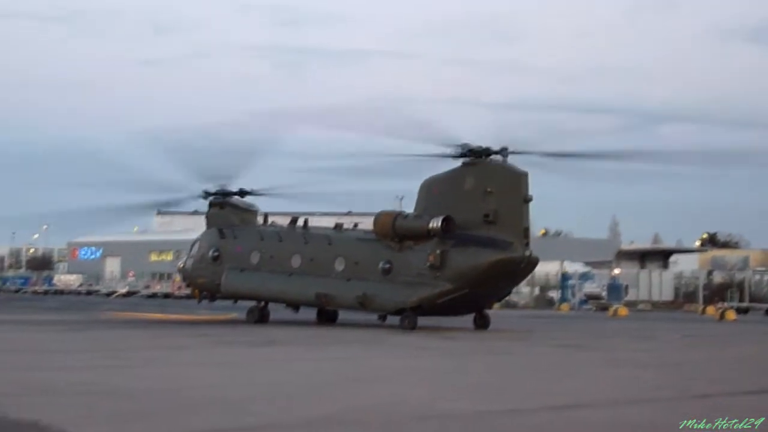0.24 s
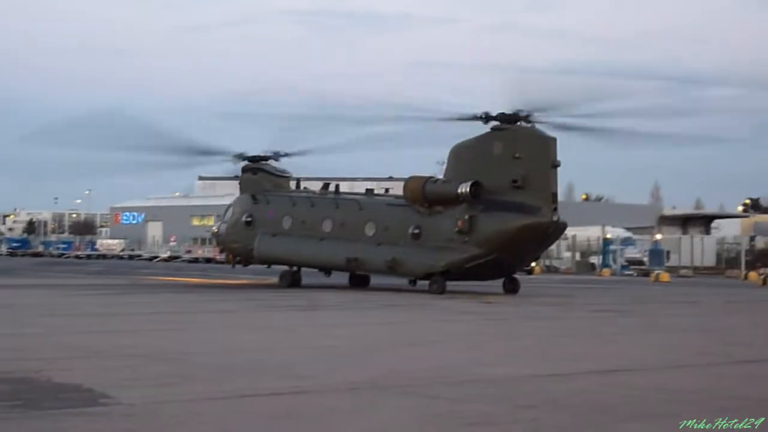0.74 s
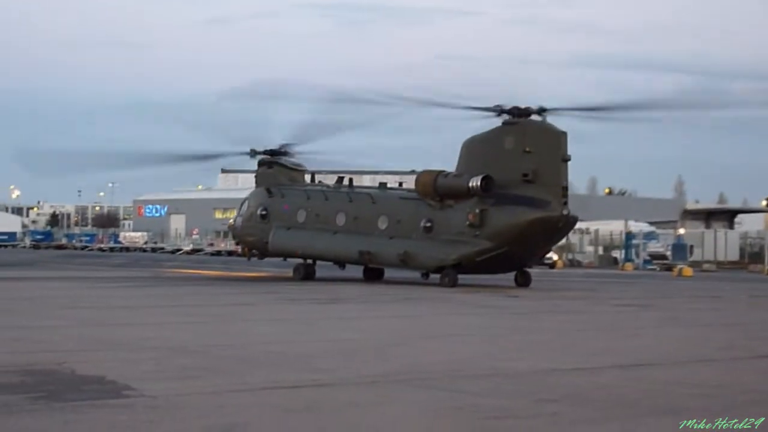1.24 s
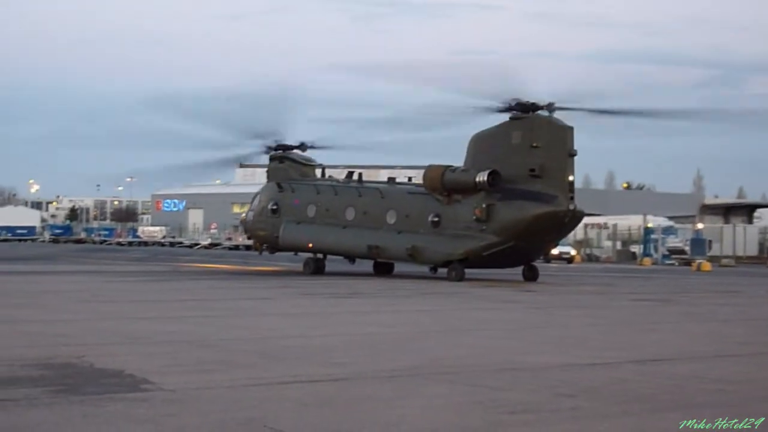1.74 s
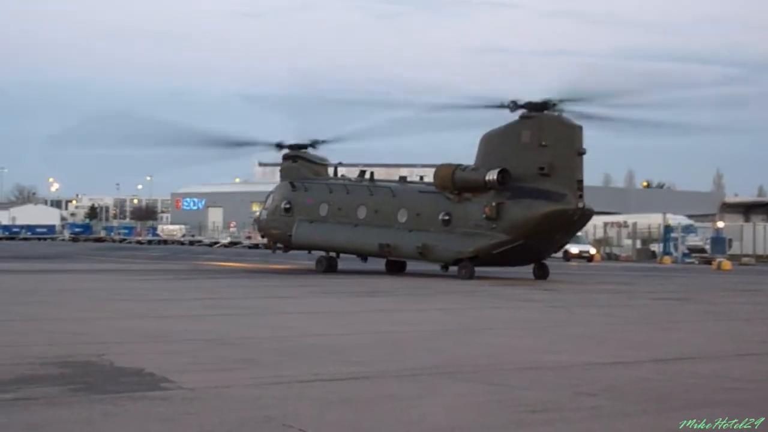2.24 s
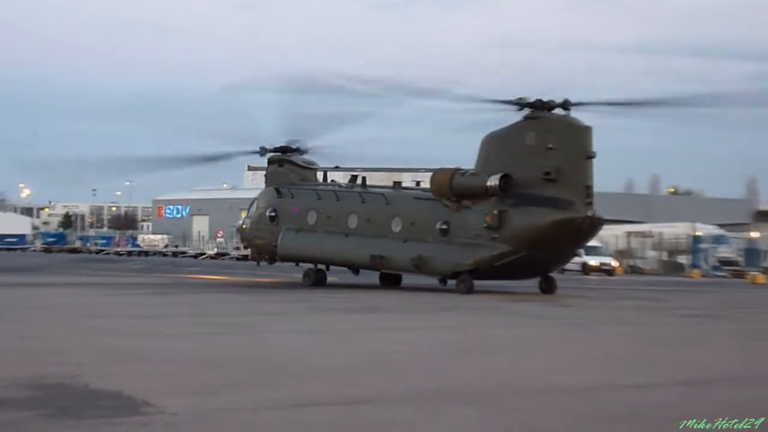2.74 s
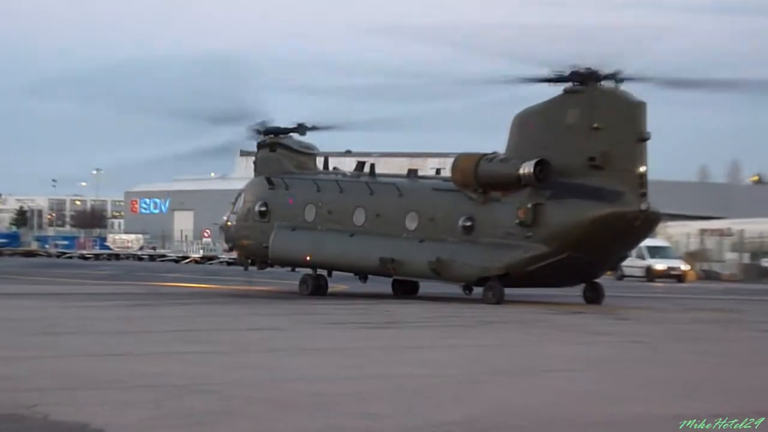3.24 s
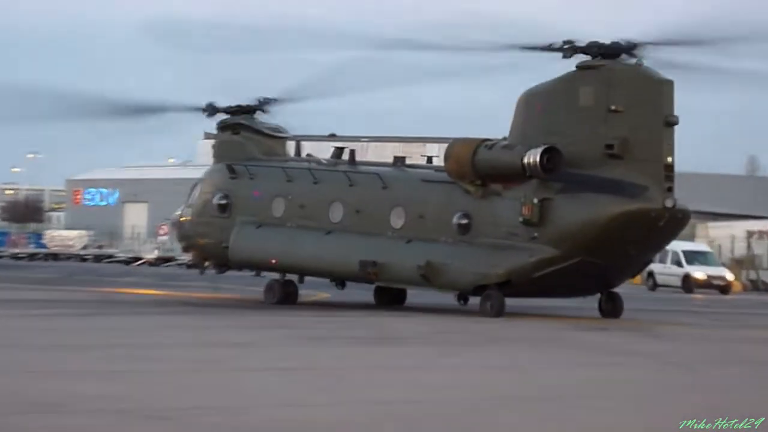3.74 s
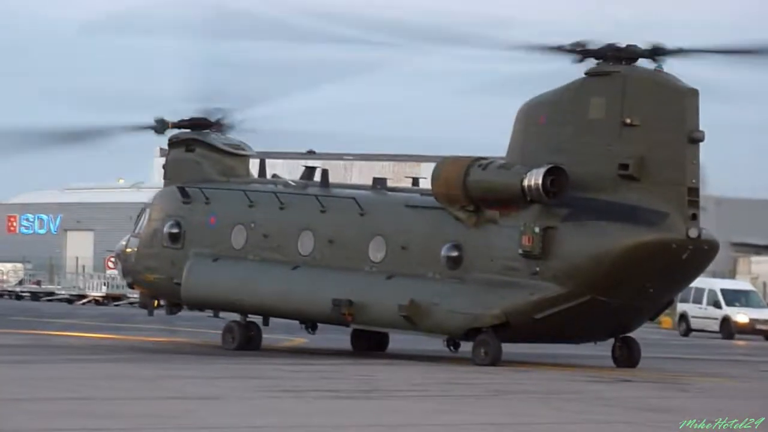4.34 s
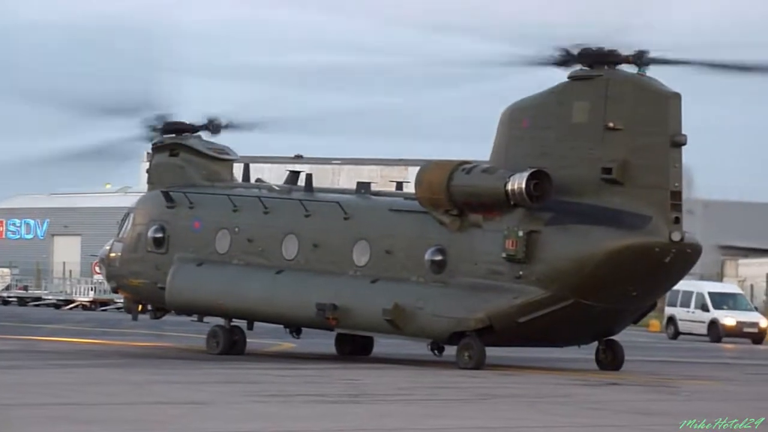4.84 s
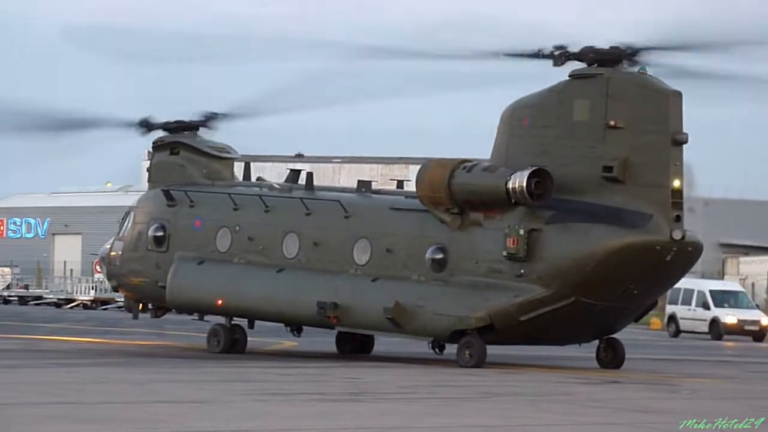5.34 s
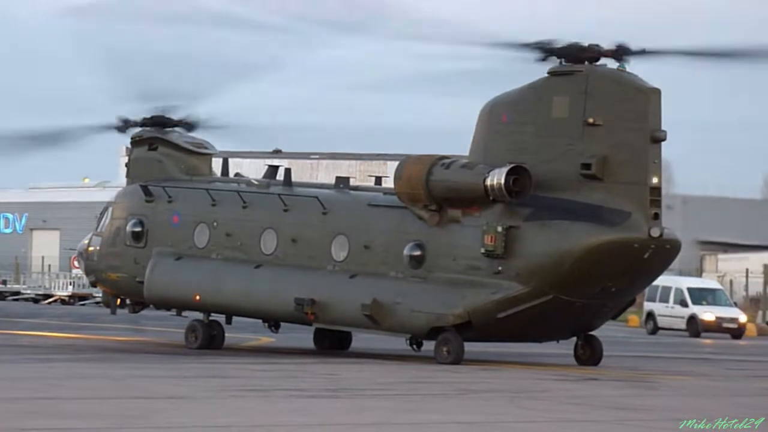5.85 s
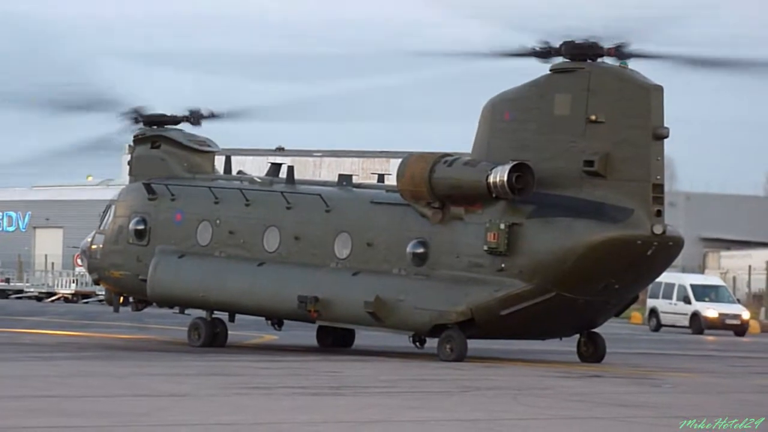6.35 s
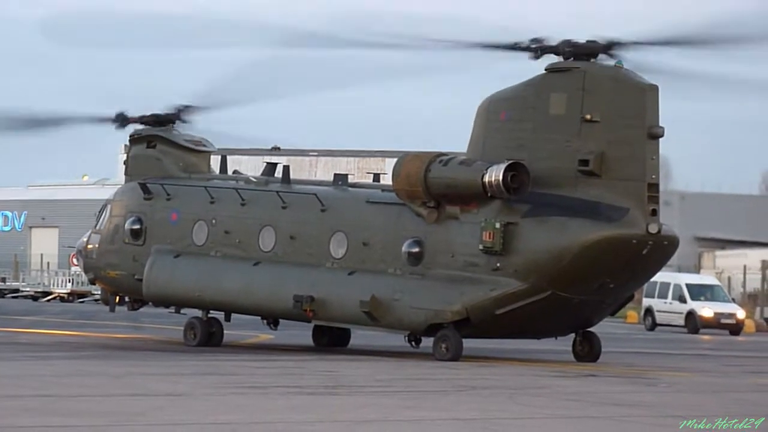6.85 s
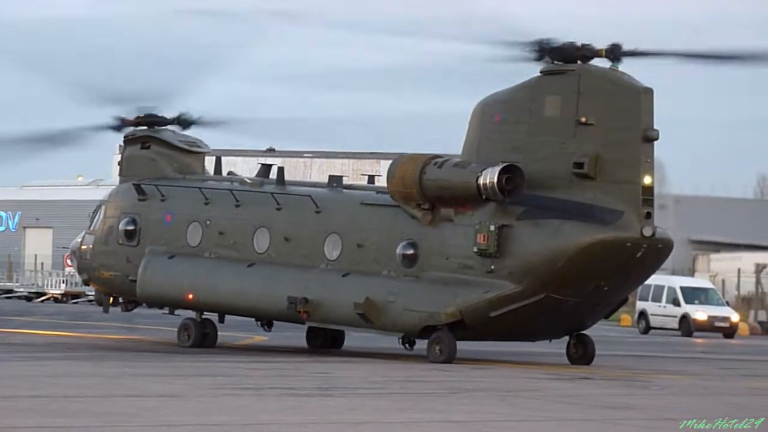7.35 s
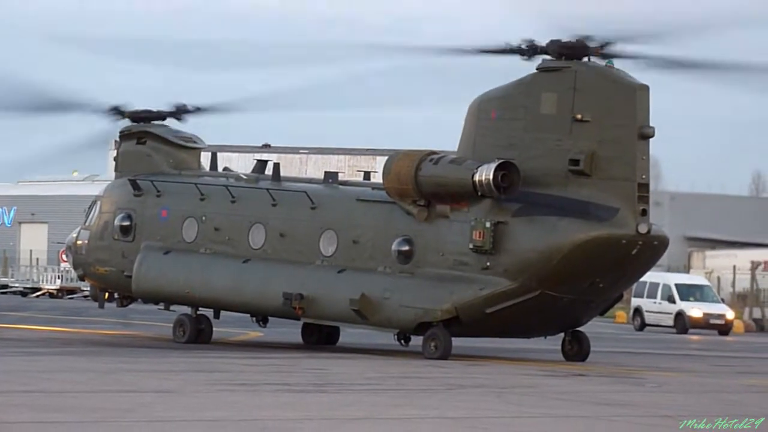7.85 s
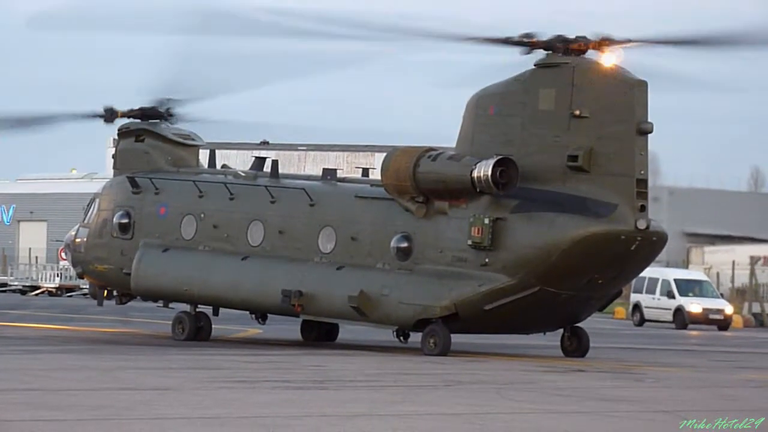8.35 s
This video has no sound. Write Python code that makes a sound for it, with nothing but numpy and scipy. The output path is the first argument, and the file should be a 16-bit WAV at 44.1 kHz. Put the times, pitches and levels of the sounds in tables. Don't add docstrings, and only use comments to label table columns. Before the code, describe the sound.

A large twin-rotor helicopter taxis on an open concrete apron about fifty metres away. Rapid, slightly uneven deep thumps and grainy swishes ride over constant turbine hiss and a thin high whine. Isolated sharp slaps come early, bunch into a rapid run just after four seconds, then return near seven. Small stereo microphone, mostly centred, softly overloaded, with short echoes off ground and wall.

```python
import sys
import numpy as np
from scipy import signal
from scipy.fft import rfft, irfft, next_fast_len
from scipy.io import wavfile
from scipy.ndimage import uniform_filter1d

SR = 44100
rng = np.random.default_rng(int(sys.argv[2]) if len(sys.argv) > 2 else 0)


def wav_record(signal):
    frames = np.transpose(np.atleast_2d(signal))
    bounded = np.clip(frames, -1, 1)
    quanta = np.round(bounded * 32767).astype(np.int16)
    wavfile.write(sys.argv[1], SR, quanta)


def decibels_to_gain(level_db):
    exponent = np.asarray(level_db, float) / 20
    return 10 ** exponent


N = 379260

BLADE_HZ = 11.25
T = np.arange(N) / SR
PAD = next_fast_len(N + SR // 2)
HZ = np.maximum(np.arange(PAD // 2 + 1) * SR / PAD, 1)


def rms_one(x):
    return x / np.sqrt(np.mean(x ** 2) + 1e-20)


def in_time(rows):
    s, *columns = np.transpose(rows)
    return [np.interp(T, s, c) for c in columns]


def at_hz(points):
    hz, value = np.transpose(points)
    return np.interp(np.log(HZ), np.log(np.maximum(hz, 1)), value)


def filtered(x, response):
    return irfft(rfft(x, PAD) * response, PAD)[..., :N]


def drift(rate):
    r = np.exp(-80 * np.pi * rate / SR)
    slow = signal.lfilter([1], [1, -2 * r, r * r], rng.standard_normal(N // 40 + 4002))[4000:]
    return np.interp(np.arange(N) / 40, np.arange(len(slow)), rms_one(slow))


def evened(x, span_s, share):
    span = int(span_s * SR)
    power = uniform_filter1d(uniform_filter1d(x[0] ** 2, span), span)
    return rms_one(x / (power + .06) ** (np.clip(share, 0, 1) / 2))


def air(spectrum):
    return rms_one(filtered(rng.standard_normal((2, N)), decibels_to_gain(at_hz(spectrum))))


def passes(rows, strays, scatter_db, scatter_s):
    s, *columns = np.transpose(rows)
    start = np.arange(int(N / SR * BLADE_HZ) + 1) / BLADE_HZ
    front_db, rear_db, front_ms, rear_ms = [np.interp(start, s, c) for c in columns]
    chance = rng.standard_normal((2, 2, len(start)))
    when = start + np.array([front_ms, rear_ms]) / 1000 + scatter_s * chance[0]
    loudness_db = [front_db, rear_db] + scatter_db * chance[1]
    events = np.c_[when.ravel(), loudness_db.ravel()]
    inside = (events[:, 0] >= 0) & (events[:, 0] < (N - 1) / SR)
    return np.r_[events[inside], strays]


def beats(events, floor_db, lift_db, rise_s, fall_s):
    s, db = np.transpose(events)
    floor_power = decibels_to_gain(floor_db) ** 2
    marks = np.zeros(N)
    marks[(s * SR).astype(int)] = np.maximum(decibels_to_gain(db + lift_db) ** 2 - floor_power, 0)
    lag = np.arange(-SR // 10, SR // 10 + 1) / SR
    swell = np.exp(-.5 * (lag / np.where(lag < 0, rise_s, fall_s)) ** 2)
    return np.sqrt(floor_power + np.abs(signal.fftconvolve(marks, swell, "same")))


def apron():
    # [f/Hz, width/Hz, level/dB]
    resonances = [(444, 28, 1.5), (463, 15.4, -2.5), (511, 38, 4.5), (522.5, 14.4, -10.5), (760, 94, 1.5),
                  (930, 250, -1), (1109, 105, 4.5), (1284, 170, -2.5), (1457, 43, 3), (1803, 470, -3),
                  (2550, 46, 3.5), (2585, 140, -3), (2980, 100, 5.5), (3040, 60, -1.5), (4080, 67, 2)]
    ground = 0.14 / (1 + (HZ / 4000) ** 2) * np.exp(-2j * np.pi * HZ * 0.001354)
    wall = 0.28 / (1 + (HZ / 600) ** 4) * np.exp(-2j * np.pi * HZ * 0.01043)
    lift_db = sum(db / (1 + (2 * (HZ - hz) / width_hz) ** 2) for hz, width_hz, db in resonances)
    floor_cut = 1 / (1 + (92 / HZ) ** 14)
    return (1 + ground) * (1 - wall) * decibels_to_gain(lift_db) * floor_cut


def turbines():
    # [t/s, whine level/dB, jet hiss level/dB, exhaust band level/dB]
    engine_levels = [
        (0.0, -40, -25.5, -29.5),
        (0.24, -43, -25, -31),
        (1.58, -43.5, -26, -37),
        (5.1, -49, -30, -32.5),
        (5.46, -44, -26, -30),
        (7.14, -48, -26.5, -34),
        (7.52, -43.5, -25, -32.5),
        (8.6, -46.5, -27.5, -36),
    ]
    # [t/s, f/Hz]
    whine_pitch = [
        (0, 6505),
        (2.2, 6500),
        (3.4, 6462),
        (8.6, 6468),
    ]
    # [t/s, level/dB]
    gear_level = [
        (0, -44),
        (.3, -48),
        (1.8, -47),
        (2.1, -41),
        (2.4, -46),
        (8.6, -47),
    ]
    # [f/Hz, level/dB per Hz]
    jet_colour = [(150, 3.5), (300, -1.5), (700, -3), (1500, -7.5), (3000, -11.5), (4500, -14.5),
                  (6000, -18.5), (7000, -21), (8000, -34.5)]
    whine_db, jet_db, exhaust_db = in_time(engine_levels)
    whine_hz, = in_time(whine_pitch)
    gusts = decibels_to_gain(.6 * drift(4))
    jet = decibels_to_gain(jet_db - 1.5) * gusts * air(jet_colour)
    exhaust_air = air([(2900, -55), (3400, 5.5), (3600, -2), (3950, 0.5), (4500, -23)])
    exhaust = decibels_to_gain(exhaust_db - 6.5 + 2.0 * drift(17)) * exhaust_air
    spin = 2 * np.pi * np.cumsum(whine_hz) / SR
    scatter = [drift(36) * np.cos(spin) + drift(36) * np.sin(spin) for side in range(2)]
    whine = decibels_to_gain(whine_db) * np.array(scatter)
    gear = decibels_to_gain(1.5 * drift(5) - 1) * np.cos(2 * np.pi * 1783 * T + .8 * drift(3))
    return jet + exhaust + whine + decibels_to_gain(in_time(gear_level)[0]) * gear


def rotor_orders():
    # [t/s, broad part level/dB, peaked part level/dB]
    disc_loading = [
        (0, -39, -35.5),
        (1.5, -38, -38.5),
        (2.5, -38.5, -36),
        (3.5, -40, -32.5),
        (4.5, -40, -34),
        (5.5, -42, -40),
        (6.5, -39, -36),
        (7.5, -40, -32.5),
        (8.6, -37, -35),
    ]
    # [multiple of blade rate, level over loading/dB, sign and weight, fade/dB per s turning away]
    low_orders = [(1, -24, 1, 2), (2, -3, -1.2, 0), (3, 2, 0.82, .9), (4, 4.5, 0.57, 4), (5, 2, 0.97, 0.5),
                  (6, -2.5, 0.75, 1), (7, -4.5, 0.48, 0)]
    broad_db, peaked_db = in_time(disc_loading)
    turn = 2 * np.pi * BLADE_HZ * (T - .0347 - .0006 * T)
    out = 0
    for k, db, sign, fade_db in low_orders:
        wobble = decibels_to_gain(.25 * k * drift(1.5))
        loading_db = peaked_db if k > 4 else broad_db
        strength = wobble * decibels_to_gain(db - fade_db * T + loading_db)
        phase = k * turn + .5 + 0.007 * k ** 2 * drift(0.39)
        out = out + np.sqrt(2) * sign * strength * np.cos(phase)
    rumble = decibels_to_gain(-42) * air([(12, -36), (30, -18), (60, 0), (72, -6), (84, -22), (130, -50)])
    return out * [[1], [1]] + rumble


def tip_swish(swishes, thumps):
    # [f/Hz, level/dB per Hz]
    tip_colour = [(150, -31), (300, 3.5), (700, -2), (1500, -4.5), (3000, -12), (4500, -16), (6000, -17),
                  (8000, -27.5)]
    patch_edges = [250, 550, 1100, 1900, 2800, 4400, 8000]
    swish = beats(swishes, floor_db=-31.5, lift_db=-0.16, rise_s=0.0033, fall_s=0.0084)
    thump = beats(thumps, floor_db=-19.5, lift_db=1.5, rise_s=0.004, fall_s=0.007)
    noise = rfft(rng.standard_normal((2, N)), PAD) * decibels_to_gain(at_hz(tip_colour))
    out = 0
    for low, high in zip(patch_edges, patch_edges[1:]):
        band = irfft(noise * (HZ >= low) * (HZ < high), PAD)[:, :N]
        share = np.clip(400 / low - .3, 0, 1)
        patchy = decibels_to_gain(1.2 * drift(20))
        depth = .55 if low > 4000 else 1 - share
        out = out + band * patchy * (swish / swish.mean()) ** depth * (thump / thump.mean()) ** share
    grain = decibels_to_gain(1.56 * drift(100))
    return grain * rms_one(out) * np.sqrt(np.mean(swish ** 2))


def wake_thump(thumps):
    # [f/Hz, level/dB per Hz]
    wake_colour = [(50, -55), (85, -13), (151, -2), (240, 2), (281, -11.5), (329, -9), (366, -22),
                   (433, -15.5), (539, -30), (731, -17.5), (900, -22.5), (1170, -58), (1980, -120)]
    # [f/Hz, share]
    likeness = [(60, .9), (150, .8), (260, .62), (450, .3), (900, .03)]
    # [t/s, small eddies' share of the thump/dB]
    eddy_size = [
        (0.0, -3.5),
        (0.4, -11.5),
        (1.0, -6.5),
        (2.0, -3.5),
        (2.4, -9),
        (2.9, -5),
        (4.4, -4.5),
        (5.2, -7.5),
        (8.6, -6),
    ]
    share = np.clip(at_hz(likeness), 0, .97)
    one_pass_ago = np.exp(-2j * np.pi * HZ / BLADE_HZ)
    repeat = np.sqrt(1 - share ** 2) / (1 - share * one_pass_ago)
    wake = rfft(rng.standard_normal((2, PAD))) * repeat * decibels_to_gain(at_hz(wake_colour))
    small = np.clip(decibels_to_gain(in_time(eddy_size)[0]), 0, .95)
    is_large = HZ < 200
    large_ones = evened(rms_one(irfft(wake * is_large, PAD)[:, :N]), span_s=.09, share=.9)
    small_ones = evened(rms_one(irfft(wake * ~is_large, PAD)[:, :N]), span_s=.09, share=.9)
    eddies = np.sqrt(1 - small ** 2) * large_ones + small * small_ones
    envelope = beats(thumps, floor_db=-24.0, lift_db=1.5, rise_s=0.0046, fall_s=0.0093)
    return evened(rms_one(eddies), span_s=.010, share=.7) * envelope


def slaps():
    # [t/s, peak level/dB, body f/Hz]
    cracks = [(0.673, -11, 1400), (0.757, -11, 843), (1.335, -10, 500), (2.043, -9, 700),
              (2.759, -8.5, 763), (3.386, -10.5, 737), (4.043, -9, 1500), (4.132, -6, 1500),
              (4.220, -6.5, 1400), (4.309, -9, 1450), (4.398, -8, 1400), (4.486, -8, 1350),
              (4.577, -10, 1650), (4.667, -9, 1450), (4.848, -9, 300), (4.886, -12, 900), (4.935, -11, 260),
              (5.022, -12, 260), (5.107, -11, 260), (5.533, -12, 300), (6.579, -9, 700), (6.935, -10, 260),
              (7.026, -9, 260), (7.114, -11, 500), (7.205, -8, 1200), (7.253, -13, 1150),
              (7.512, -10, 1400), (8.181, -11, 500)]
    out = np.zeros((2, N + 2000))
    lag = np.arange(2000) / SR
    chance = rng.standard_normal((len(cracks), 2, 2000))
    for (s, db, body_hz), hiss in zip(cracks, chance):
        cycles = lag * min(body_hz, 800)
        step = -np.exp(-((cycles - .6) / .25) ** 2) + 1.5 * np.exp(-((cycles - 1.2) / .3) ** 2)
        ring = np.exp(-lag / 0.005) * (1 - np.exp(-lag / 0.0005))
        knock = 0.73 * np.sin(2 * np.pi * body_hz * lag) * ring
        burst = .5 * signal.lfilter([.4, -.4], [1, -1.45, .55], hiss) * np.exp(-lag / 0.0012)
        first = int(s * SR)
        out[:, first:first + 2000] += decibels_to_gain(db - 5) * (step + knock + burst)
    return out[:, :N]


def scene():
    # [t/s, front level/dB, rear level/dB, front lag/ms, rear lag/ms]
    bite = [(0.0, -16.5, -17.5, 0, 72), (0.51, -24, -16, 23, 45), (1.01, -16.5, -20.5, 20, 63),
            (1.52, -18.5, -17.5, 9.5, 46), (2.02, -16, -18, 10, 68), (2.53, -15.5, -20, 22.5, 51),
            (3.04, -17.5, -20, 2, 36), (3.54, -15.5, -17, 7, 47), (4.05, -16, -18, 10, 33),
            (4.55, -19, -20, 13.5, 70), (5.06, -17, -16.5, 4, 47), (5.56, -15.5, -17.5, 20, 45),
            (6.07, -17, -17.5, 20, 46), (6.58, -16, -20.5, 7.5, 47), (7.08, -18, -19.5, 6.5, 38),
            (7.59, -18.1, -22, 15.5, 51), (8.09, -16.5, -16.5, 19, 49), (8.6, -17.5, -17.5, 19, 51)]
    # [t/s, front level/dB, rear level/dB, front lag/ms, rear lag/ms]
    sweep = [(0.0, -24.5, -24, 7.3, 49), (0.51, -37, -21.5, 15, 46), (1.01, -22, -23, 14, 54),
             (1.52, -26, -23.1, 15, 48), (2.02, -23.5, -23, 16, 53), (2.53, -24.5, -24, 12, 44),
             (3.04, -22.5, -24.0, 9.5, 38), (3.54, -26.5, -24.2, 16, 56), (4.05, -30, -19, 9, 59),
             (4.55, -23, -23, 12, 45), (5.06, -20.5, -30, 15, 47), (5.56, -28, -26, 8.3, 37),
             (6.07, -22, -23.5, 17, 46), (6.58, -22.5, -23.1, 20, 56), (7.08, -26, -26.5, 8.1, 51),
             (7.59, -25, -19.5, 31, 49), (8.09, -27.5, -22.4, 18, 47), (8.6, -27, -19, 20, 49)]
    # [t/s, level/dB]
    extra_thumps = [(0.239, -16.5), (0.277, -18.5), (0.323, -20), (0.862, -23), (1.562, -17.5), (2.365, -16),
                    (2.413, -15.5), (2.698, -17), (2.784, -16.3), (2.858, -20), (3.111, -15.5), (3.827, -22),
                    (4.817, -16.5), (4.847, -19.5), (4.937, -18.5), (5.11, -20), (5.295, -14.5),
                    (5.617, -26), (5.823, -24.5), (5.974, -20), (6.583, -28.5), (6.783, -21), (6.85, -13.5),
                    (7.06, -21.5), (7.309, -17.5), (7.383, -19), (7.854, -21.5), (7.932, -18)]
    # [t/s, level/dB]
    extra_swishes = [(0.04, -30), (0.076, -22), (0.172, -24), (1.219, -21), (1.263, -23.5), (1.295, -29.5),
                     (1.331, -28), (2.682, -27), (2.85, -25), (3.223, -21.5), (3.304, -19.5), (3.606, -25),
                     (4.067, -23), (4.132, -20), (4.236, -24.5), (4.801, -19), (5.537, -25), (5.737, -20),
                     (5.953, -26), (6.2, -21.5), (6.731, -24.0), (7.21, -19), (7.255, -20.2), (7.327, -18),
                     (7.501, -24.0), (8.223, -24.5), (8.315, -24.5), (8.407, -27)]
    # [f/Hz, side minus mid level/dB]
    spread = [(60, -32), (110, -26.5), (200, -32.5), (350, -22), (640, -27.5), (1160, -15.5), (2100, -9),
              (3790, -6), (6860, -1), (12400, 9)]
    # [f/Hz, left minus right level/dB]
    balance = [(60, .1), (500, .2), (1000, -.2), (2000, -.7), (8000, -.9), (12000, -1.2)]
    thumps = passes(bite, extra_thumps, scatter_db=1.2, scatter_s=.003)
    swishes = passes(sweep, extra_swishes, scatter_db=1.0, scatter_s=.0015)
    turbulence = turbines() + tip_swish(swishes, thumps) + wake_thump(thumps) + slaps()
    mid, side = rfft(turbulence, PAD) * apron() + rfft(rotor_orders(), PAD)
    side = side * decibels_to_gain(at_hz(spread) - 3.0)
    lean = decibels_to_gain(at_hz(balance) / 2)
    return irfft([(mid + side) * lean, (mid - side) / lean], PAD)[:, :N]


def top_cut(x):
    return signal.sosfilt(signal.butter(12, 13000, fs=SR, output="sos"), x)


def record(dry):
    # [f/Hz, level/dB]
    mirror = [(8000, 10.5), (8500, -6.5), (9530, -15), (10000, -21), (11500, -34), (12500, -41),
              (14000, -65)]
    # [f/Hz, width/Hz]
    notches = [(5437, 210), (7903, 330)]
    sampling_hz = 16000
    response = 1. * (HZ < sampling_hz / 2)
    for hz, width_hz in notches:
        off = (HZ - hz) / width_hz
        response = response * off / (off - 1j)
    rounded = 1.5 * np.tanh(dry / 1.3)
    base = filtered(rounded, response)
    folded = 2 * base * np.cos(2 * np.pi * sampling_hz * T)
    image = filtered(folded, decibels_to_gain(at_hz(mirror)) * (HZ >= sampling_hz / 2))
    return top_cut(base + image)


dry = scene()
out = record(dry)
wav_record(out)
```